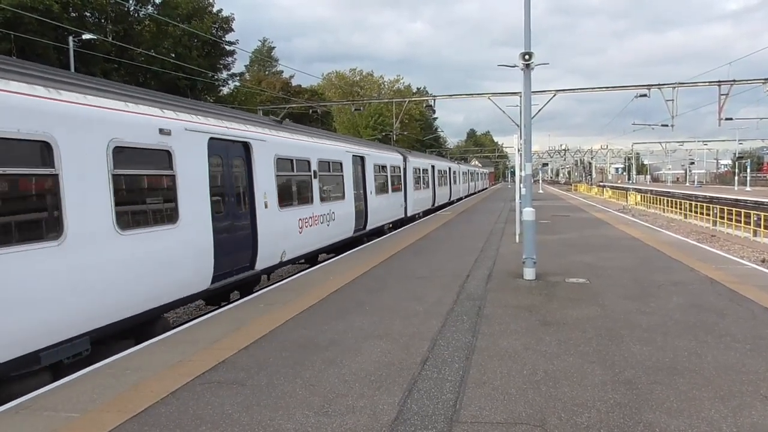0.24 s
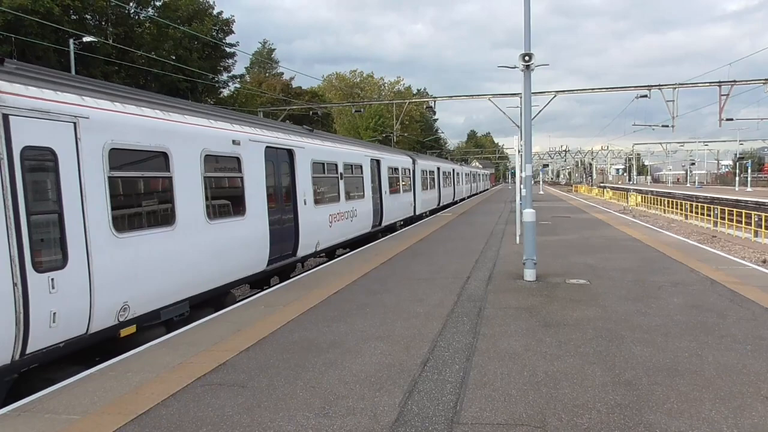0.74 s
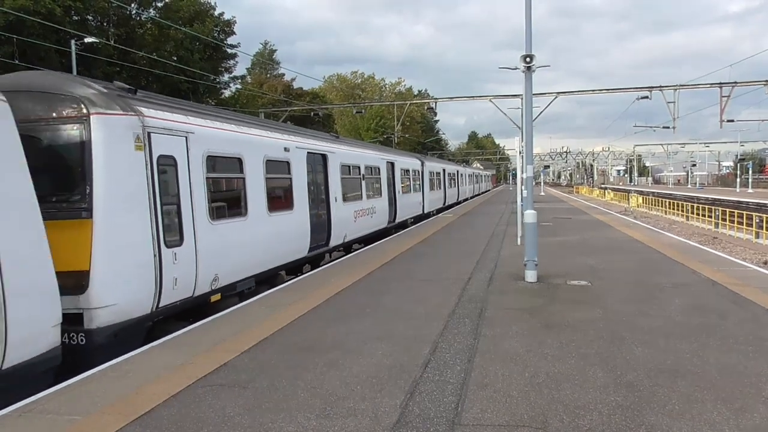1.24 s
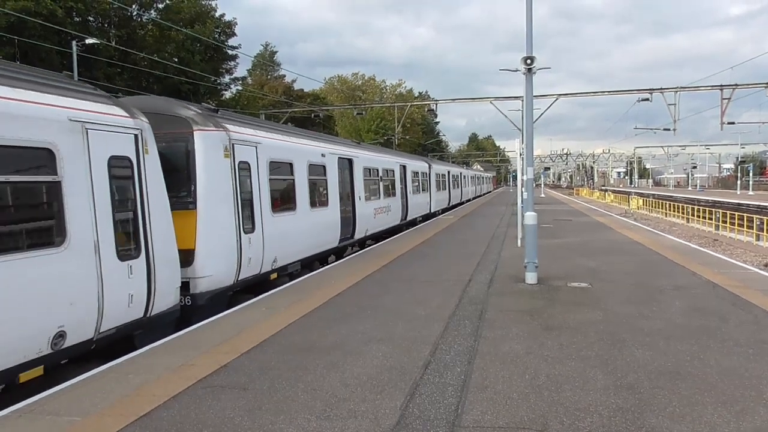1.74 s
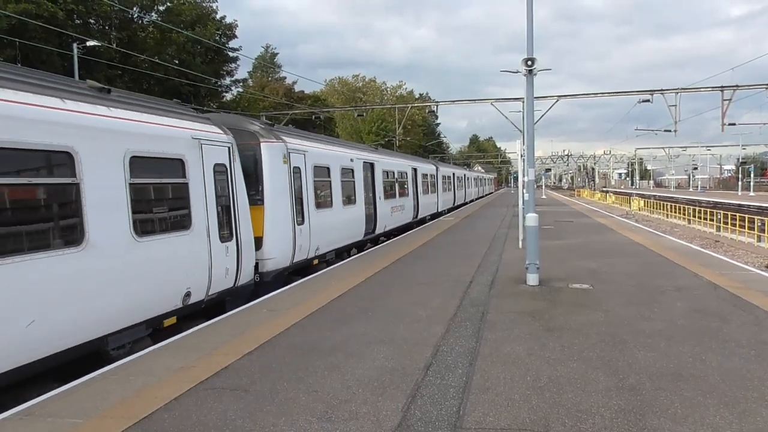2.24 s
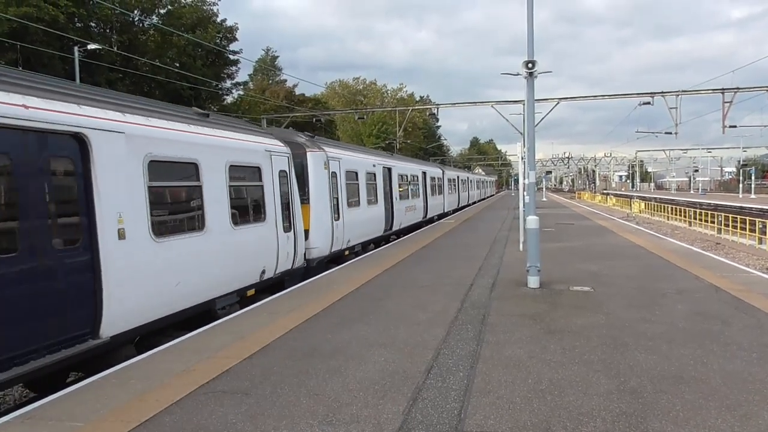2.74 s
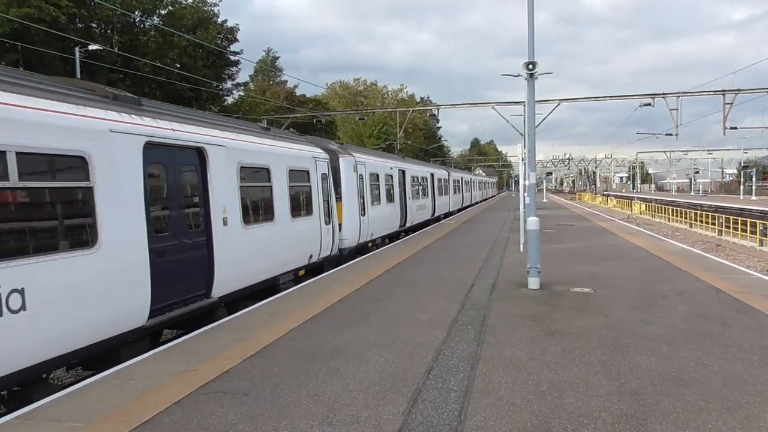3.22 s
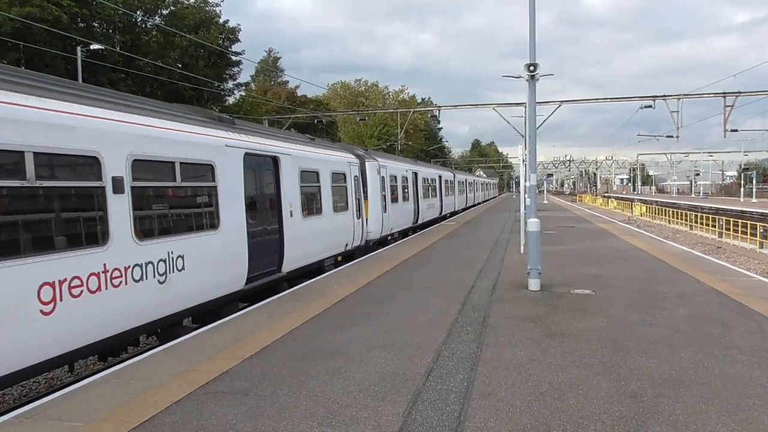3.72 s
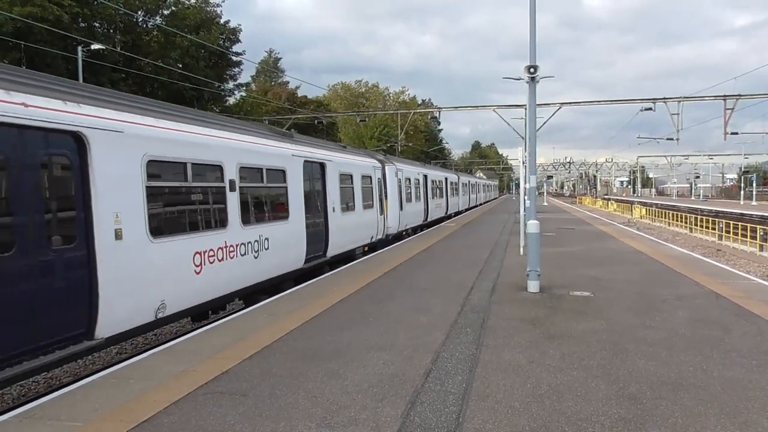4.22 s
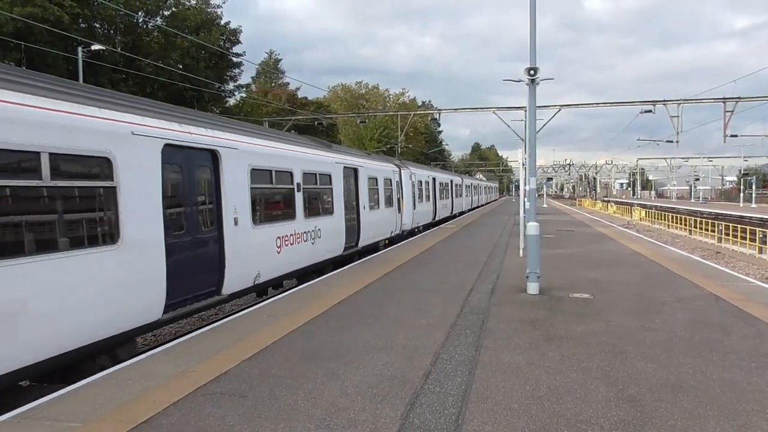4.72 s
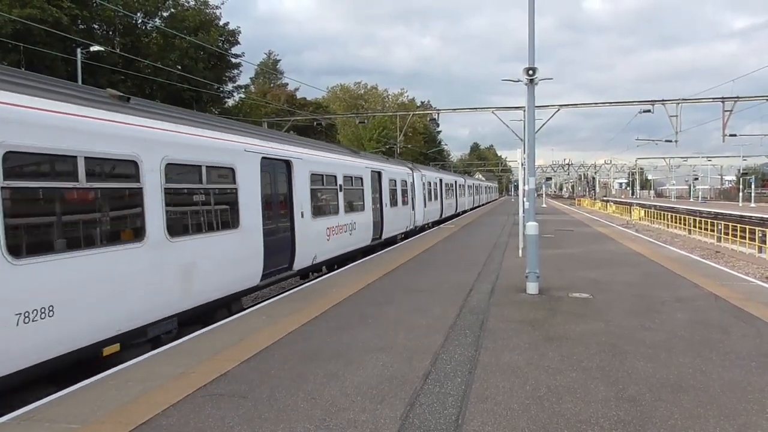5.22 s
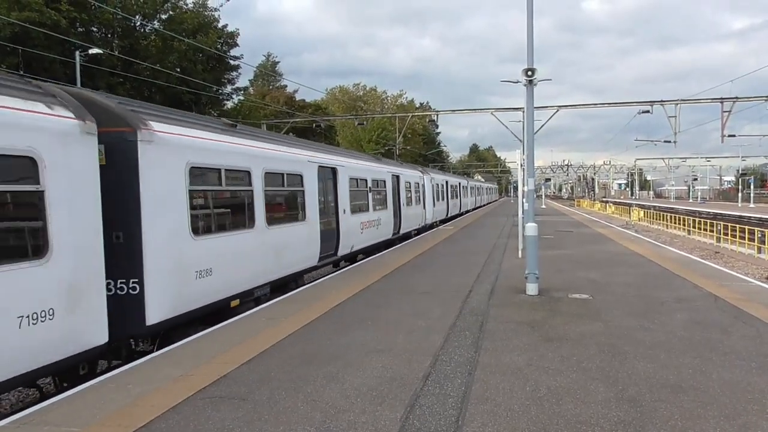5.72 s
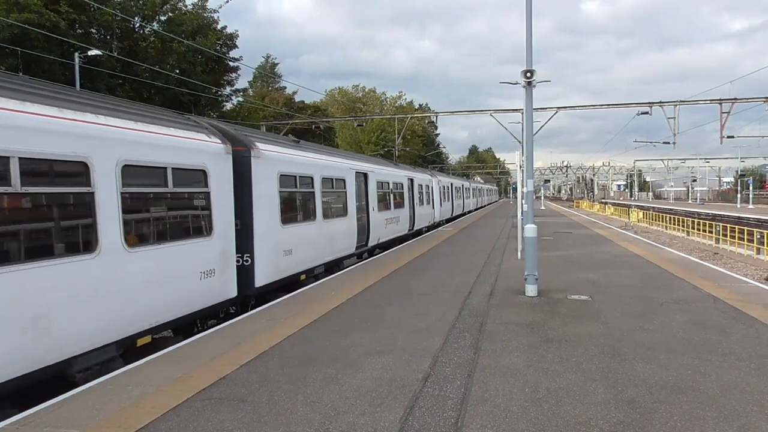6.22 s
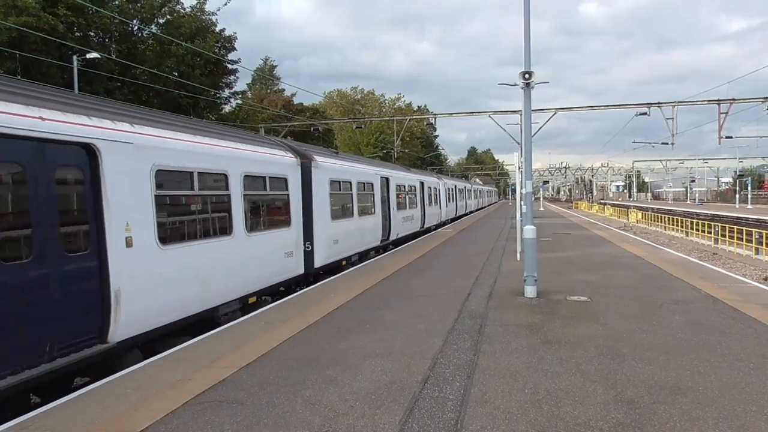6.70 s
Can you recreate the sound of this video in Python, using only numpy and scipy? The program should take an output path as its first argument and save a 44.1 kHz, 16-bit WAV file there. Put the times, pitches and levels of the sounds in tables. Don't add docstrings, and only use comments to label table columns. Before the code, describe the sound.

An electric passenger train accelerates past a small stereo camera microphone on an open-air platform. From 0 s there is continuous low rolling rumble with a mid-range roar and thin hiss, a soft thud at once and another near 1 s. Soft short air puffs spit between 0.5 and 1.3 s. Solid wheel thumps over joints land around 1.6, 2.3 and 3.1 s, then more closely from 3.6 s, with brake gear knocks and brief steel rattles. A small dry tick and air spit come near 3.4 and 4.6 s. Under it, a distant gear hum climbs gradually, stronger after 4.5 s, while wheels and panels sing briefly in passing. A faint high air leak swells after 5 s. Heavy thumps hit near 5.4, 5.9 and 6.4 s; the motor hum is loud and close by 6.3 s. At about 6.75 s a hard air puff bursts, followed by a final heavy thump at 6.9 s.

```python
import sys
import numpy as np
from scipy import signal
from scipy.fft import rfft, irfft, next_fast_len
from scipy.io import wavfile
from scipy.ndimage import uniform_filter1d, map_coordinates

SR = 44100
rng = np.random.default_rng(int(sys.argv[2]) if len(sys.argv) > 2 else 0)


def waveform_to_disk(signal):
    frames = np.transpose(np.atleast_2d(signal))
    scaled = np.clip(frames, -1, 1) * 32767
    samples = np.round(scaled).astype(np.int16)
    wavfile.write(sys.argv[1], SR, samples)


def invert_db(x):
    u = np.asarray(x, float) / 20
    return 10 ** u


N = 306936


def unit(x):
    return x / np.sqrt(np.mean(np.abs(x) ** 2) + 1e-20)


def along(points, hz):
    f, value = np.transpose(points)
    return np.interp(np.log(hz + 1), np.log(f + 1), value)


def curves(rows):
    s, *columns = np.transpose(rows)
    return [np.interp(np.arange(N) / SR, s, column) for column in columns]


def wobble(rate):
    knots = rng.standard_normal(int(N * rate / SR) + 4)
    return map_coordinates(knots, [np.arange(N) * rate / SR])


def filtered(x, response):
    m = next_fast_len(N + 8192)
    spectrum = rfft(x, m) * response(np.fft.rfftfreq(m, 1 / SR))
    return irfft(spectrum, m)[..., :N]


def colour(spectrum):
    closed = [(spectrum[0][0] / 2, -120), *spectrum, (spectrum[-1][0] * 2, -120)]
    return lambda hz: invert_db(along(closed, hz))


def rush(response, patchy_db):
    z = signal.stft(rng.standard_normal((2, N)), nperseg=1024)[2]
    field = uniform_filter1d(rng.standard_normal(z.shape[1:]), size=5, axis=0)
    field = uniform_filter1d(field, size=6, axis=1)
    pair = signal.istft(z * invert_db(patchy_db * unit(field)), nperseg=1024)[1][:, :N]
    return unit(filtered(pair, response))


def singing(modes, swell_db):
    def peak(centre, width):
        return lambda f: (1j * f * width / (centre ** 2 - f * f + 1j * f * width)) ** 2

    total = np.zeros((2, N))
    for centre, width, db in modes:
        total += invert_db(db + swell_db * wobble(2.86)) * rush(peak(centre, width), patchy_db=3.0)
    return total


# freq_hz, density_db (per Hz)
RUMBLE_COLOUR = [(18, -48), (30, -17), (86, 1.5), (166, -3), (264, -0.5), (362, -3.5), (559, -14),
                 (700, -19), (910, -17), (1540, -120)]
ROAR_COLOUR = [(320, -20), (550, -4.5), (1060, -6), (1380, -17.5), (1600, -17), (1770, -23.5), (2200, -22),
               (2600, -30), (3200, -34), (4160, -44), (7040, -120)]
HISS_COLOUR = [(2300, -17), (2900, 1.5), (3800, 3.5), (4800, -0.5), (5800, -4), (7000, -1.5), (8600, 0.5),
               (10500, -3.5), (12500, -8.5), (14000, -10.5), (15200, -17), (15700, -33)]
# centre_hz, width_hz, level_db (above the rumble or roar)
RAIL_MODES = [(289, 31, -17), (357.2, 50, -17.5), (433.4, 34, -16)]
WHEEL_MODES = [(1077, 35, -20.5), (2118, 460, -18.5), (4700, 240, -33)]
# time_s, strength_db, bogie_db
ROLLING_STRENGTH = [(0, 1.5, -1.5), (.35, -1, 0), (1, 2.5, -1.5), (1.7, 1, .5), (2.1, .5, 1.5),
                    (2.55, 0, 1), (3.08, 0, 1.3), (3.35, 1.5, 0), (3.9, 2, 0), (4.8, 4.5, 0.5),
                    (5.2, 4.5, 0.5), (5.5, 4.5, 0.5), (6.3, 6, 0.5), (6.55, 5.5, 1), (6.96, 6, 1.5)]
RUMBLE_DB, ROAR_DB, HISS_DB = -30, -41.5, -59.5
RUMBLE_GROWS, ROAR_GROWS, HISS_GROWS = 0.99, 0.66, 1.22


def rolling():
    strength_db, bogie_db = curves(ROLLING_STRENGTH)
    axles = wobble(3.797)
    rumble = rush(colour(RUMBLE_COLOUR), patchy_db=.5) + singing(RAIL_MODES, swell_db=1.5)
    roar = rush(colour(ROAR_COLOUR), patchy_db=1.37) + singing(WHEEL_MODES, swell_db=-0.5)
    hiss = rush(colour(HISS_COLOUR), patchy_db=1.2)
    rumble_db = RUMBLE_DB + RUMBLE_GROWS * strength_db + 0.4 * axles
    roar_db = ROAR_DB + ROAR_GROWS * strength_db + bogie_db + 0.48 * axles
    hiss_db = HISS_DB + HISS_GROWS * (strength_db + 0.96 * bogie_db) + 0.42 * wobble(13)
    return invert_db(rumble_db) * rumble + invert_db(roar_db) * roar + invert_db(hiss_db) * hiss


# crest_s, peak_db, pitch_hz, length_ms,
# looseness_db
TIGHT_JOINT = [(0.97, -18, 149, 6.5, 3), (1.6179, -10.5, 192, 9.3, 3.5), (1.658, -21, 230, 6.4, -15),
               (2.2667, -11.5, 189, 7.1, -1), (3.0563, -9, 190, 3.7, 6.5), (3.067, -15, 230, 4.6, -2),
               (3.63, -13.5, 186, 10, 2.5), (4.3469, -15, 314, 1.9, 3), (5.004, -15, 173, 7.1, -4),
               (5.9043, -9, 193, 9.5, -6), (6.371, -12.5, 188, 11, -7), (6.939, -7.5, 174, 4.6, -1)]
REBOUND_S, REBOUND_DB, REBOUND_PITCH = 0.01146, -19, 1.3
# crest_s, peak_db, pitch_hz
DIPPED_JOINT = [
    (.089, -23, 142),
    (3.72, -12, 136),
    (4.266, -12, 138),
    (4.945, -11.5, 144.4),
    (5.432, -9, 153),
]
DIP_MS, SLEEPER_PITCH, SLEEPER_DB = 26.8, 1.48, -6
# crest_s, peak_db, pitch_hz, length_ms
JOLTED_GEAR = [
    (.858, -21, 343, 21),
    (1.525, -25, 349, 30),
    (1.602, -26, 790, 7),
    (3.617, -21, 429, 27),
    (4.469, -19, 228, 10),
    (4.86, -18, 434, 13.5),
    (5.361, -18, 376, 9.3),
    (5.822, -31, 594, 6),
    (5.884, -25, 593, 7),
    (5.9, -21.5, 420, 27),
]
TIGHT_CLANK_DB, DIP_CLANK_DB, JOLT_CLANK_DB = -20.5, -22, -14


def blows():
    every = []
    for s, db, hz, ms, loose_db in TIGHT_JOINT:
        every.append((s, db, hz, ms, db + TIGHT_CLANK_DB + loose_db))
        every.append((s + REBOUND_S, db + REBOUND_DB, hz * REBOUND_PITCH, ms, -120))
    for s, db, hz in DIPPED_JOINT:
        every.append((s, db, hz, DIP_MS, db + DIP_CLANK_DB))
        every.append((s, db + SLEEPER_DB, hz * SLEEPER_PITCH, DIP_MS, -120))
    for s, db, hz, ms in JOLTED_GEAR:
        every.append((s, db, hz, ms, db + JOLT_CLANK_DB))
    return every


# freq_hz, density_db
CLANK_COLOUR = [(200, -18), (400, 10.5), (900, -4.5), (1500, -19), (3000, -33), (6000, -37)]


def joints():
    push, rattle = np.zeros(N + SR), np.zeros(N + SR)
    lead_in = SR // 20
    t = np.arange(-lead_in, SR // 5) / SR
    for s, db, hz, ms, clank_db in blows():
        at = slice(round(s * SR), round(s * SR) + len(t))
        half = np.where(t < 0, .4, .6) * ms / 1000
        swell = np.exp(-np.log(2) * np.abs(t / half) ** 3)
        ring = invert_db(-15 - 60 * t / .18) * (t > 0) * (1 - swell)
        phase = np.pi + rng.normal(0, 0.23)
        push[at] += invert_db(db) * (swell + ring) * np.cos(2 * np.pi * hz * t + phase)
        rattle[at] += invert_db(clank_db) * np.where(t < 0, swell, invert_db(-60 * t / 0.16))
    push, rattle = push[lead_in:][:N], rattle[lead_in:][:N]
    late = np.roll(push, 90)
    return np.array([push, late]) + rattle * rush(colour(CLANK_COLOUR), patchy_db=3.5)


# time_s, nearness_db
MOTOR_NEARNESS = [(0, -29), (1.25, -22), (1.6, -16.5), (2.0, -22), (3.4, -12.5), (4.2, -16.5),
                  (4.65, -10.5), (5.45, -9), (5.75, -6.5), (5.9, -3), (6.08, -5.5), (6.3, -1), (6.6, -0.5),
                  (6.96, -3)]
# order, level_db (when near), growth_db (per dB of nearness)
LOW_ORDERS = [(1, -31, 1.1), (2, -30, 1.6), (3, -32, .8), (4, -33, 1.25)]
# order, level_db, share (of the fourth order's swell that they follow)
HIGH_ORDERS = [(5, -45, .5), (6, -46, .9), (7, -49, .8), (5.82, -49, .9), (6.2, -50, .9), (4.72, -52, .8)]
# centre_hz, width_hz, lift_db
FRAME_MODES = [(114.4, 15.6, 4.5), (230, 3.4, 6.5), (236.8, 5.4, 2.5), (246, 1.84, 8.5), (252, 4.5, 9.5),
               (270, 10, 7.5), (283.3, 11.5, 5.5), (302, 11, 6), (320.2, 12.5, 7.5), (353, 5.4, 5.5),
               (363, 3, 9), (368.6, 3.3, 8.5), (372.4, 2.4, 8.5), (504, 110, 1)]
TEETH_AT_START, TEETH_GAINED = 70, 8.2
TEETH_SAG = 1.3


def gears():
    t, (near_db,) = np.arange(N) / SR, curves(MOTOR_NEARNESS)
    rate = TEETH_AT_START + TEETH_GAINED * t - TEETH_SAG * np.exp(-((t - 4.6) / .4) ** 2)
    turn = 2 * np.pi * np.cumsum(rate) / SR
    shaft = turn / 6.1

    def frame(hz):
        return 0.56 + sum(invert_db(db) / (1 + (2 * (hz - c) / w) ** 2) for c, w, db in FRAME_MODES)

    levels = [db + grows * near_db for _, db, grows in LOW_ORDERS]
    orders = list(enumerate(levels, 1))
    orders += [(k, db + share * (levels[-1] + 43.0)) for k, db, share in HIGH_ORDERS]
    hum = np.zeros((2, N))
    for k, db in orders:
        start = rng.uniform(0, 2 * np.pi, (2, 1))
        beat = 1 + 0.37 * np.exp(1j * (shaft + start[0] + .5 * wobble(2.85)))
        worn = invert_db(1.8 * wobble(11)) * np.exp(.2j * np.sqrt(k) * (wobble(9) + wobble(30)))
        tone = np.real(beat * worn * np.exp(1j * (k * turn + start)))
        hum += np.sqrt(2) * invert_db(db) * frame(k * rate) * tone
    return hum


# crest_s, length_s, pitch_hz, level_db
PASSING_SONGS = [(1.15, .12, 1040, -50), (1.55, .25, 350, -38), (2.05, .35, 352, -41), (2.1, .5, 1048, -48),
                 (2.93, .25, 365, -37), (3.6, .25, 362, -40), (4.8, .3, 430, -38), (5.1, .4, 1056, -47),
                 (5.72, .25, 369, -33), (6.46, .22, 389, -27), (6.72, .1, 388, -28), (6.87, .1, 305, -28),
                 (6.88, .14, 360, -28), (3.9, 1.1, 2200, -60), (5.35, 1.1, 2140, -57),
                 (6.762, .02, 1200, -36), (4.641, .003, 5200, -45), (4.642, .003, 6900, -49)]
SHAKE_HZ = 1300


def songs():
    t, tone = np.arange(N) / SR, np.zeros((2, N))
    for s, length, hz, db in PASSING_SONGS:
        swell = np.exp(-np.log(2) * (2 * (t - s) / length) ** 2)
        blur = (hz / SHAKE_HZ) ** 2 * 0.52 * wobble(70)
        shake = 0.65 * wobble(18) + blur + rng.uniform(0, 2 * np.pi, (2, 1))
        level = np.sqrt(2) * invert_db(db + 2.7 * wobble(22))
        tone += level * swell * np.cos(2 * np.pi * hz * t + shake)
    return tone


# start_s, peak_db, rise_ms, t60_s
AIR_PUFFS = [(.486, -53, 10, 0.33), (.65, -57, 8, .2), (.84, -61, 9.2, .2), (1.087, -54, 6, 0.26),
             (1.254, -52, 2.7, .1), (1.3, -54, 8.8, .2), (2.46, -54, 5, 0.13), (2.78, -64, 5, .1),
             (3.389, -48, .4, .02), (3.68, -61, 8, .2), (3.717, -51, 2, .2), (4.639, -46, 0.45, 0.037),
             (4.936, -52, 3, .1), (6.752, -28, 4.5, 0.22)]
# freq_hz, density_db
JET_COLOUR = [(1000, -27), (2200, -23), (3700, -8.5), (4900, -9.5), (5900, -11.5), (7100, -1.5), (9700, 8),
              (11500, -3), (13400, -5), (15600, -15)]


def valves():
    flow, t = np.zeros(N + SR), np.arange(SR // 2) / SR
    for s, db, rise_ms, t60 in AIR_PUFFS:
        rise = rise_ms / 1000
        opening = np.clip(t / rise, 0, 1) ** 2
        spit = 1 + 1.4 * invert_db(.6 * (db + 24.5)) * invert_db(-60 * np.abs(t - rise) / 0.036)
        flow[round(s * SR):][:len(t)] += invert_db(db - 60 * t / t60) * opening * spit
    return flow[:N] * rush(colour(JET_COLOUR), patchy_db=-1.5)


# time_s, centre_hz, level_db
PIPE_LEAK = [
    (0, 7800, -85),
    (3.3, 7860, -78),
    (4.4, 7900, -76),
    (5.1, 8200, -63),
    (5.8, 8900, -65),
    (6.4, 9250, -65),
    (6.96, 9000, -61),
]


def leak():
    hz, t, z = signal.stft(rng.standard_normal((2, N)), SR, nperseg=512)
    s, centre, _ = np.transpose(PIPE_LEAK)
    band = np.exp(-.5 * ((hz[:, None] - np.interp(t, s, centre)) / 450) ** 2)
    hiss = signal.istft(z * band, SR, nperseg=512)[1][:, :N]
    return invert_db(curves(PIPE_LEAK)[1]) * unit(hiss)


# freq_hz, likeness (0-1)
TRAIN_ALIKE = [(35, .72), (70, .96), (140, .98), (300, .91), (700, .82), (2000, .78), (3200, .62),
               (5400, .13), (6800, .4), (9000, .44), (12300, .06), (15000, .2)]
JET_ALIKE = [(2000, .6), (5500, .45), (7000, .7), (9000, .88), (11000, .82), (12000, .52), (15000, .5)]
# freq_hz, difference_db
LEFT_LOUDER = [(60, -1), (200, -2), (380, -0.5), (700, 1.5), (1290, 4.5), (2380, 2.5), (4400, 1.5),
               (5800, 5), (7200, -0.5), (9500, 0), (12200, -4), (15000, -3)]
# freq_hz, lead_rad
LEFT_LEADS = [(0, 0), (520, .6), (1720, .55), (3190, .9), (4000, 1.4), (5000, 1.7), (6200, .5), (7000, .9),
              (8600, 2.4), (11000, 2.9), (13000, 4.4), (15500, 6.2)]


def ports(pair, alike, lean_db):
    def spread(hz):
        angle = np.arccos(np.clip(along(alike, hz), -1, 1)) / 2
        return np.array([np.cos(angle), np.sin(angle)])

    def sides(hz):
        f, lead = np.transpose(LEFT_LEADS)
        left = invert_db((along(LEFT_LOUDER, hz) + lean_db) / 2) * np.exp(.5j * np.interp(hz, f, lead))
        return np.array([left, 1 / left])

    direct, scattered = filtered(pair, spread)
    return filtered(np.array([direct + scattered, direct - scattered]), sides)


def scene():
    wheels = ports(rolling() + joints(), TRAIN_ALIKE, lean_db=1.14)
    motor = ports(gears() + songs(), TRAIN_ALIKE, lean_db=1.4)
    air = ports(valves(), JET_ALIKE, lean_db=-1.0) + ports(leak(), TRAIN_ALIKE, lean_db=2.0)
    return wheels + motor + air


def band_limit(x):
    return signal.sosfilt(signal.butter(12, 15950, fs=SR, output="sos"), x)


def record(dry):
    passed = lambda hz: (hz < 15680) * (1j * hz / (38 + 1j * hz)) ** 2
    mix = filtered(dry, passed)
    return band_limit(mix)


dry = scene()
out = record(dry)
waveform_to_disk(out)
```